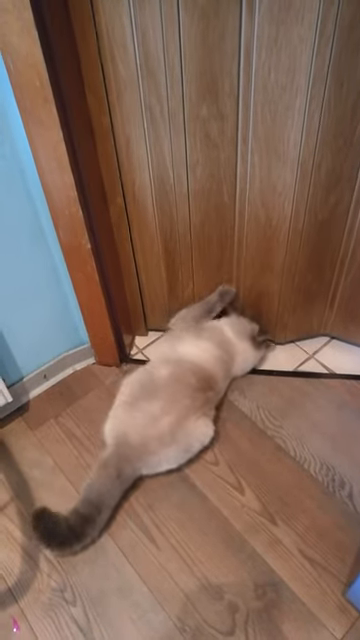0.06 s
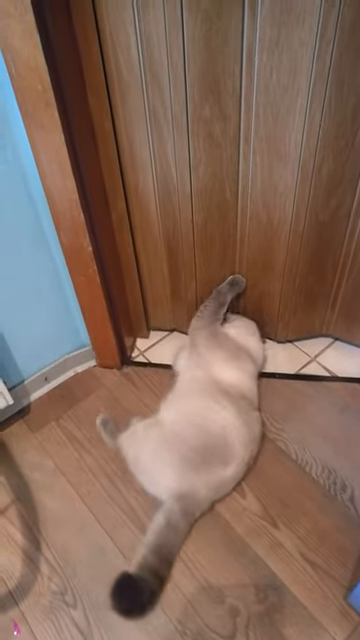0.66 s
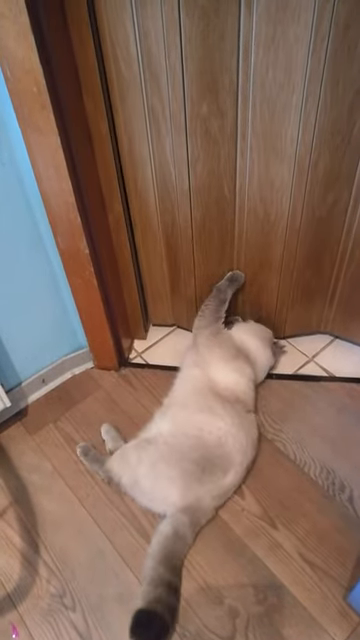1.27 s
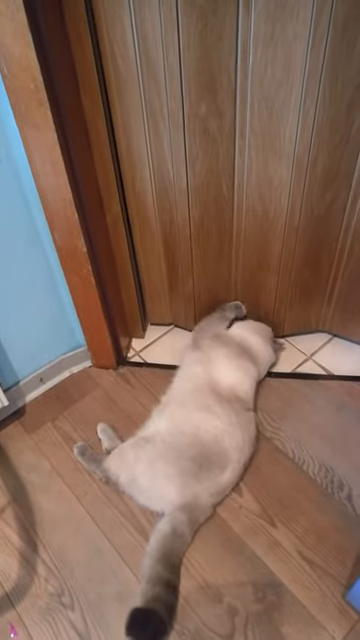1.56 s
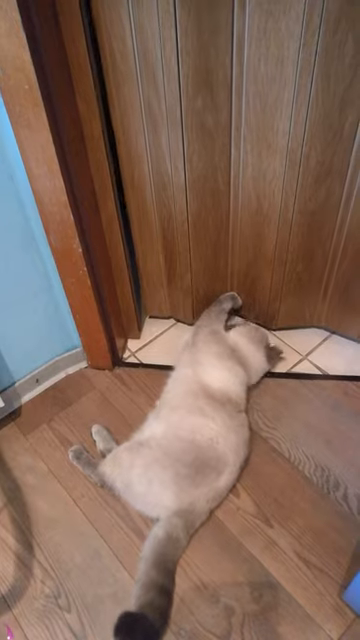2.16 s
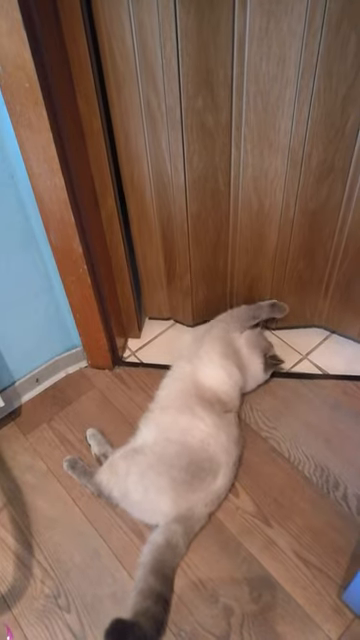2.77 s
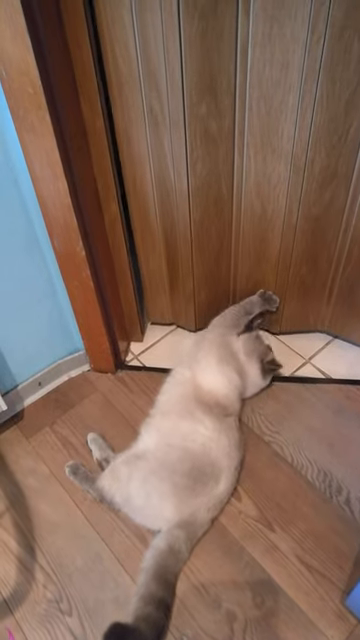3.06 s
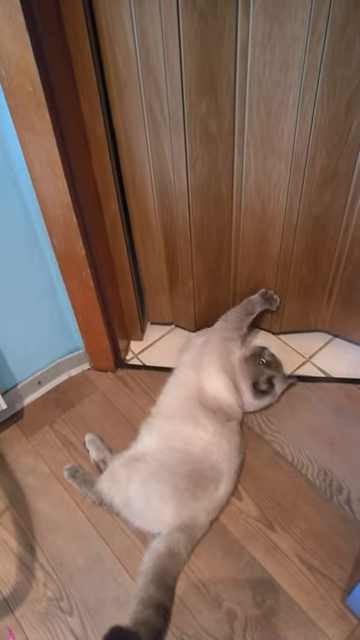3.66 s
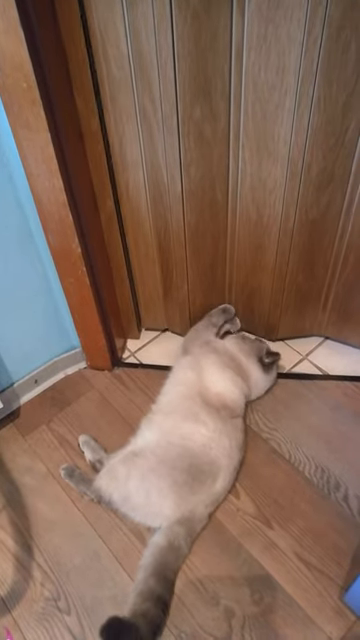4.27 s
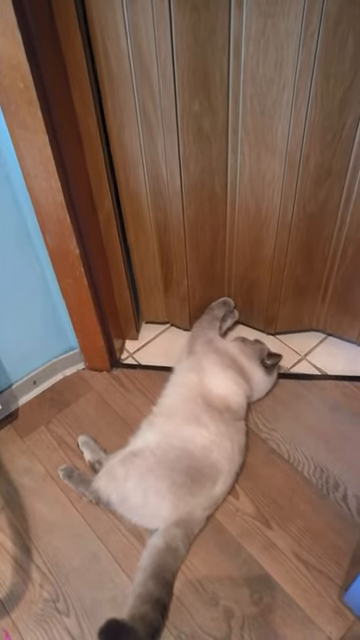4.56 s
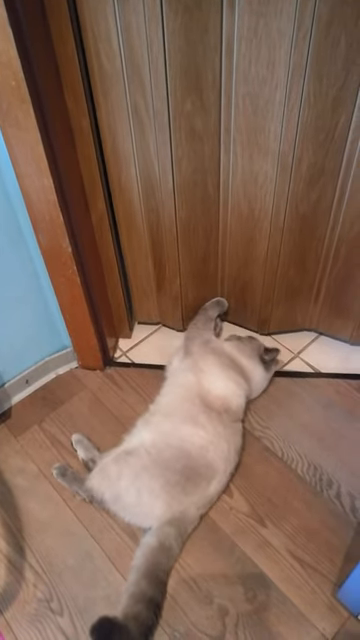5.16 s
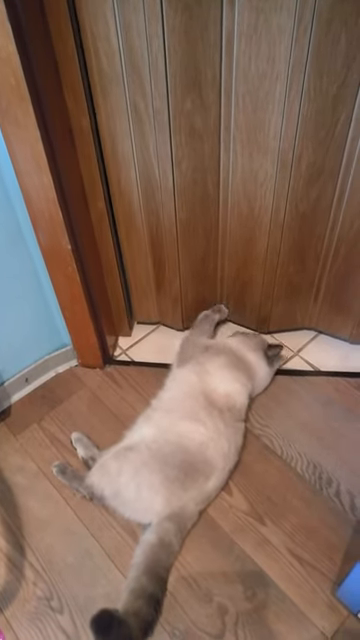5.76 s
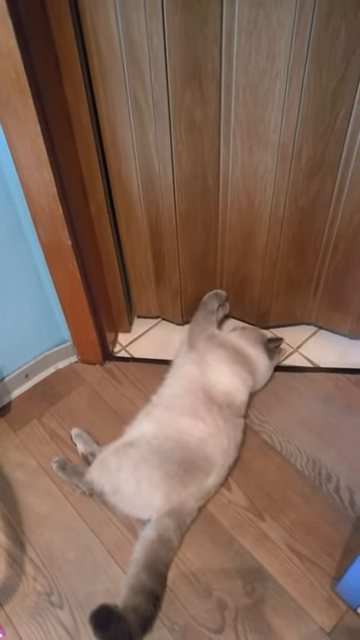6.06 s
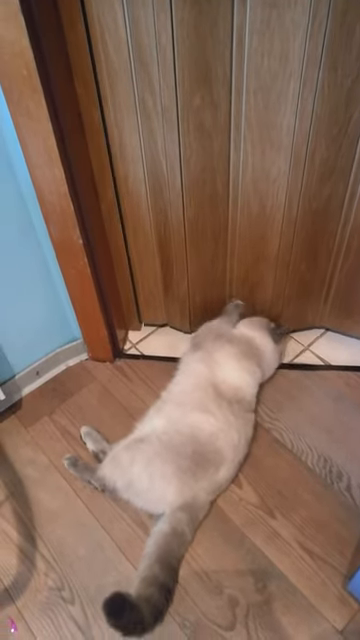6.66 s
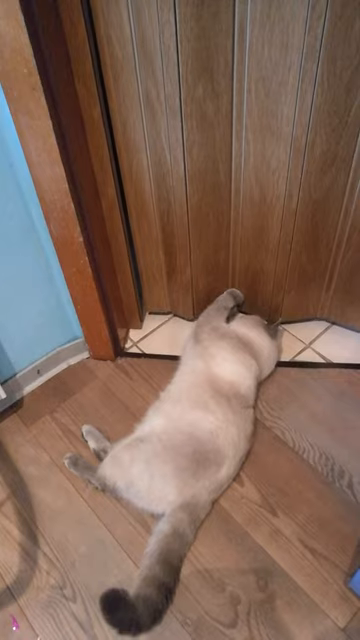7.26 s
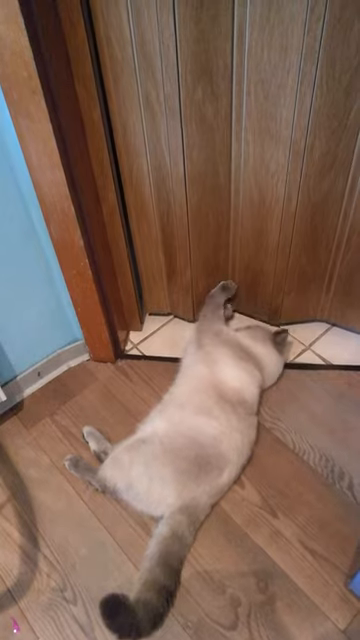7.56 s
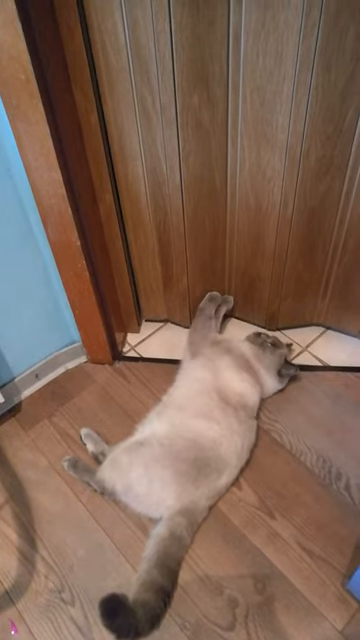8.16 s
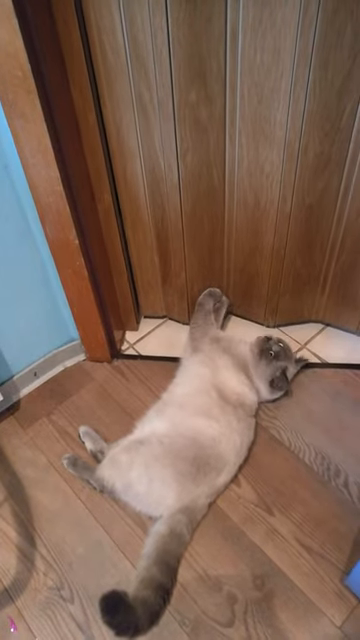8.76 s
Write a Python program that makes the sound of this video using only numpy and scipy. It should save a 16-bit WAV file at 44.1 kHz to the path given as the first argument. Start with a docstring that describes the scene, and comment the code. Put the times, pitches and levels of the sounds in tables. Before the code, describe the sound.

A cat scratches at a folding door, heard from nearby in a small room with a short, bright echo and a very quiet hush. From about 0.4 to 1.3 seconds, claws click rapidly and scrape over thin hollow slats while the door rumbles softly in its track. A second flurry from 1.6 seconds peaks in clattering knocks near 2 seconds, followed by a tiny paw squeak and more scratches around 2.5. From 3 to 4.7 seconds there are only light ticks, weak scrapes and faint swishes like cat sniffs or fur rubs. A hollow thump lands at 5 seconds, with smaller bumps after it. Quick claw ticks and gritty strokes return from 6 seconds, with a low bump at 6.6 and a sharp click and knock at 7.6. Another small squeak and soft swishes follow from 8 seconds, over a barely audible high whine.

```python
"""A cat paws at a folding door in a small hard room, heard from a phone held above.
Claws flick the thin hollow slats and drag over them in gritty stick-slip strokes; pads squeak.
Soft swishes come between: faint breaths or sniffs, among pad and fur rubs.
The shoved door knocks, rings hollow and rumbles in its track. The room adds a short
bright ring over a very quiet hush; a faint thin whine joins near the end."""
import sys
import numpy as np
from scipy import signal
from scipy.fft import rfft, irfft
from scipy.io import wavfile
from scipy.ndimage import uniform_filter1d

SR = 44100
rng = np.random.default_rng(int(sys.argv[2]) if len(sys.argv) > 2 else 0)


def dump_mix(stems):
    """Bounce the given channels to the path in sys.argv[1] as a 16-bit WAV at rate SR."""
    frames = np.atleast_2d(stems).T  # one column per channel
    limited = np.clip(frames, -1, 1)  # hard clip at full scale
    pcm = np.round(limited * 32767).astype(np.int16)
    wavfile.write(sys.argv[1], SR, pcm)


N = 393372
TIME_S = np.arange(N) / SR

# room hush spectrum: (frequency [Hz], gain [dB])
HUSH_EQ = [(25, -16), (70, -9), (110, -10.5), (220, -8), (500, -20.5), (1000, -19.5), (2500, -20.5),
           (6000, -29.5), (16000, -37)]
# paw strokes: (time [s], length [s], relative scrape level [dB], tilt [dB/octave], push level [dB])
PAW_STROKES = [(.01, 0.1, -64.5, 2.5, -57.5), (0.227, 0.2, -55.5, 0, -54), (0.427, 0.15, -45, 0.5, -50),
               (0.633, 0.18, -59, -3.5, -58), (0.801, 0.055, -49, 0, -45.5), (0.94, 0.08, -40, 2.5, -49.5),
               (1.055, 0.16, -52, -1, -53.5), (1.192, 0.11, -52, 0, -54), (1.582, 0.078, -49, -4.5, -49),
               (1.68, 0.16, -58, 0, -52), (1.824, 0.086, -43, 0, -47.5), (1.919, 0.07, -49, -1, -50),
               (2.25, 0.078, -51, 2, -67.5), (2.542, 0.06, -38.5, 2.5, -54), (2.72, 0.039, -60, 8, -66),
               (2.859, 0.048, -51.5, 1, -58), (3.1, 0.089, -59, 3.5, -75), (3.668, 0.28, -65, 5.5, -84),
               (3.874, 0.075, -56.5, -1, -55), (4.038, 0.093, -50.5, 2.5, -52.5),
               (4.181, 0.067, -64, -6, -63), (4.262, 0.24, -66.5, 2.5, -81), (4.952, 0.043, -43, -1, -44),
               (5.028, 0.092, -56, -5, -50), (5.204, 0.11, -64.5, -4.5, -57),
               (5.389, 0.093, -59.5, -0.5, -59), (5.555, 0.061, -57.5, -2, -49),
               (5.648, 0.11, -65, -3, -61), (5.904, 0.032, -68.5, 5, -62.5),
               (6.017, 0.13, -57.5, -1.5, -67.5), (6.204, 0.1, -46, 0.5, -69), (6.391, 0.1, -51, 0, -61.5),
               (6.59, 0.14, -45, 0, -47.5), (6.812, 0.17, -58, 1, -66.5), (6.984, 0.098, -48, 0.5, -55.5),
               (7.155, 0.082, -60, 4.5, -55), (7.298, 0.065, -56, 1, -54), (7.367, 0.12, -47, -2, -49),
               (7.563, 0.034, -45, -4, -47), (7.599, 0.03, -40.5, -2.5, -40.5),
               (7.681, 0.07, -47, -3.5, -48.5), (7.949, 0.064, -56.5, 0, -57),
               (8.067, 0.032, -55, -1, -55.5), (8.198, 0.57, -67, -1.5, -67.5)]
# scrape spectrum: (frequency [Hz], gain [dB])
SCRAPE_EQ = [(40, -15.5), (200, -13.5), (400, -2.5), (620, -1), (1050, 1.5), (1600, 3), (3200, 2),
             (6000, -0.5), (9000, -4), (13000, -6), (16000, -19)]
# slat resonances: (frequency [Hz], width [Hz], gain [dB])
SLAT_RESONANCES = [(69.7, 11, 11), (122, 24, 5.5), (167, 20, 4.5), (195, 13, 9.5), (265, 24, 3.5),
                   (326, 42, 4.5), (404, 23, 8.5), (619, 14, -1.5), (991, 20, 2), (1119, 72, 5),
                   (1533, 190, 3.5), (2600, 28, -2.5)]
# door shudder spectrum: (frequency [Hz], gain [dB])
RUMBLE_EQ = [(25, -30), (45, -10.5), (70, -3.5), (150, -4.5), (250, -6.5), (420, -14), (600, -17.5),
             (1200, -14.5), (3000, -46)]
# room decay: (frequency [Hz], T60 [s])
ROOM_DECAY = [(100, 0.17), (300, 0.35), (800, 0.42), (2000, 0.31), (5000, 0.3), (13000, 0.22)]
# claw flicks: (time [s], relative level [dB], spot)
FLICKS = [(0.105, -60, "tip"), (0.125, -48, "tip"), (0.269, -59, "glance"), (0.2907, -51, "tip"),
          (0.3893, -33.5, "slat"), (0.3978, -40, "edge"), (0.4121, -42, "edge"), (0.427, -33.5, "slat"),
          (0.443, -34, "slat"), (0.461, -34.5, "slat"), (0.4783, -33, "slat"), (0.495, -45, "slat"),
          (0.5213, -32, "slat"), (0.5503, -33.5, "slat"), (0.752, -43.5, "edge"), (0.7974, -31.5, "slat"),
          (0.829, -38.5, "edge"), (0.9388, -35, "slat"), (0.961, -37.5, "edge"), (0.9752, -35.5, "slat"),
          (0.9973, -36.5, "slat"), (1.009, -38, "slat"), (1.1469, -40.5, "edge"), (1.186, -34, "slat"),
          (1.578, -40.5, "tip"), (1.586, -42, "corner"), (1.5935, -38, "edge"), (1.605, -44, "edge"),
          (1.618, -41, "slat"), (1.629, -41.5, "slat"), (1.642, -37.5, "edge"), (1.741, -54, "tip"),
          (1.8225, -39, "edge"), (1.828, -41.5, "tip"), (1.848, -39, "corner"), (1.863, -45, "edge"),
          (1.88, -38, "slat"), (1.901, -38.5, "slat"), (1.922, -26.5, "corner"), (1.9336, -32, "edge"),
          (1.9648, -30, "corner"), (1.9932, -35.5, "edge"), (2.0268, -34, "corner"), (2.206, -50.5, "rib"),
          (2.245, -40.5, "corner"), (2.4106, -41.5, "glance"), (2.52, -49, "corner"), (2.5276, -44, "tip"),
          (2.5429, -39.5, "corner"), (2.563, -36.5, "tip"), (2.574, -38, "tip"), (2.608, -43, "tip"),
          (2.7272, -50.5, "seam"), (2.7667, -61, "tip"), (2.8971, -54.5, "corner"), (2.912, -50.5, "edge"),
          (3.0385, -62.5, "tip"), (3.1012, -50.5, "corner"), (3.223, -47.5, "corner"),
          (3.2422, -40.5, "corner"), (3.5071, -49, "edge"), (3.664, -54, "tip"), (3.683, -56.5, "hollow"),
          (3.7528, -61, "glance"), (3.868, -61, "tip"), (3.911, -60, "tip"), (3.9575, -57.5, "tip"),
          (4.055, -59, "tip"), (4.0765, -50, "corner"), (4.298, -49, "seam"), (4.709, -46.5, "rib"),
          (4.729, -44, "rib"), (4.8787, -43, "rib"), (4.9402, -42, "rib"), (4.9591, -41.5, "slat"),
          (5.039, -56, "corner"), (5.123, -54.5, "hollow"), (5.221, -56, "hollow"), (5.253, -60, "hollow"),
          (5.558, -55.5, "edge"), (5.676, -56.5, "hollow"), (5.698, -63, "rib"), (5.9169, -59.5, "tip"),
          (6.029, -61, "rib"), (6.086, -45, "rib"), (6.1258, -44.5, "rib"), (6.192, -43, "rib"),
          (6.2028, -48, "rib"), (6.2177, -41, "rib"), (6.232, -44, "rib"), (6.2595, -42.5, "rib"),
          (6.269, -48, "rib"), (6.279, -42.5, "rib"), (6.289, -43, "rib"), (6.379, -39, "rib"),
          (6.4827, -53, "edge"), (6.5772, -46, "edge"), (6.657, -48.5, "corner"), (6.68, -50, "tip"),
          (6.826, -58, "rib"), (6.864, -50, "seam"), (6.9552, -46, "hollow"), (7.096, -50, "hollow"),
          (7.239, -53.5, "slat"), (7.282, -49.5, "hollow"), (7.2977, -49.5, "corner"), (7.3348, -53, "tip"),
          (7.353, -47.5, "rib"), (7.365, -37, "edge"), (7.546, -49.5, "edge"), (7.572, -39.5, "hollow"),
          (7.5957, -26, "seam"), (7.6042, -39.5, "seam"), (7.698, -54, "rib")]
# where a claw catches: spot -> (woody body [dB], sharp edge [dB], ring [Hz], left minus right [dB])
CATCH_SPOTS = {"slat": (4.5, -7, 2688, 0.5), "rib": (-2.5, -7, 3596, -1), "hollow": (5.5, -19, 1941.5, 0),
               "tip": (-9.5, -1.5, 10497.5, 2), "edge": (1.5, -5.5, 4396.5, 0.5),
               "corner": (-1.5, -3.5, 6900, 0.5), "glance": (-29, -0.5, 7294.5, 1.5),
               "seam": (-6.5, -14.5, 5000, -1.5)}
# door on frame: (time [s], relative clatter level [dB], ring level [dB], ring centre [Hz], rise [s])
DOOR_KNOCKS = [(0.24, -67, -43.5, 168, .008), (1.264, -55, -43.5, 100, .004),
               (1.796, -46.5, -43, 229, .004), (1.924, -37.5, -42, 393, .001),
               (1.999, -41, -44, 400, 0.0011), (2.56, -44, -53, 393, 0.0035),
               (2.884, -65, -48, 149, 0.0048), (3.892, -44.5, -50, 400, 0.01),
               (4.969, -35.5, -32, 136, 0.0043), (5.12, -44.5, -43.5, 228, 0.0027),
               (5.574, -49.5, -39, 99, 0.0056), (6.63, -41.5, -39, 72.6, 0.0072),
               (7.584, -54, -38, 80, 0.0051), (7.597, -37.5, -43, 565, 0.00073),
               (8.085, -54.5, -52, 190, 0.0044)]
# clatter spectrum: (frequency [Hz], gain [dB])
CLATTER_EQ = [(30, -15.5), (70, -7), (200, -5), (400, -3), (700, -4.5), (1200, -7.5), (2500, -13.5),
              (6000, -34)]
# soft swishes: faint breaths or sniffs, among pad and fur rubs
# (time [s], length [s], relative level [dB], centre [Hz], width [octaves])
SOFT_SWISHES = [(1.428, 0.14, -57, 2070, 0.82), (3.048, 0.36, -61.5, 1220, 0.9),
                (3.064, 0.34, -65.5, 414, 0.38), (3.401, 0.12, -59.5, 1950, 0.73),
                (3.484, 0.03, -52, 1830, 0.77), (3.742, 0.12, -59, 6760, 0.17),
                (4.003, 0.042, -54.5, 1800, 0.4), (4.244, 0.047, -60.5, 2370, 0.78),
                (4.404, 0.082, -59, 2150, 0.76), (5.402, 0.085, -57.5, 2030, 0.8),
                (7.983, 0.057, -49.5, 3470, 0.65), (8.071, 0.054, -56, 1440, 1.3),
                (8.19, 0.03, -63.5, 1120, 0.98), (8.397, 0.089, -56, 2080, 0.77),
                (8.607, 0.081, -62, 1780, 1.3)]
# pad squeaks: (time [s], length [s], relative level [dB], start pitch [Hz], end pitch [Hz])
PAD_SQUEAKS = [(2.206, 0.049, -52, 1766, 1453), (7.989, 0.063, -54.5, 2430, 1990)]


def undb(db):
    """Decibels to gain."""
    return 10 ** (np.asarray(db) / 20)


def unit(x):
    """Scale to rms 1."""
    return x / np.sqrt(np.mean(x ** 2))


def bins_hz(size):
    """FFT bin frequencies, floored at 1 Hz."""
    return np.maximum(np.arange(size // 2 + 1) * SR / size, 1)


def curve(points, hz):
    """Interpolate (Hz, value) points over log frequency."""
    points_hz, values = np.transpose(points)
    return np.interp(np.log(hz), np.log(points_hz), values)


def shape(x, gain):
    """Filter by a gain per bin."""
    return irfft(rfft(x) * gain, x.shape[-1])


def add(out, start_s, x):
    """Mix x in at start_s."""
    i = max(int(start_s * SR), 0)
    out[..., i:i + x.shape[-1]] += x[..., :max(N - i, 0)]


def min_phase(db):
    """Minimum-phase spectrum with this magnitude."""
    cepstrum = irfft(db * np.log(10) / 20)
    half = len(cepstrum) // 2
    cepstrum[1:half] *= 2
    cepstrum[half + 1:] = 0
    return np.exp(rfft(cepstrum))


def convolve(x, response):
    """Convolve per channel, at most N samples."""
    return signal.fftconvolve(np.atleast_2d(x), np.atleast_2d(response), axes=1)[:, :N]


def noise(size):
    """Uncorrelated stereo white noise."""
    return rng.standard_normal((2, size))


def coloured_noise(size, eq):
    """Stereo noise through an EQ table."""
    return shape(noise(size), undb(curve(eq, bins_hz(size))))


def even_spectrum(x, width_hz=350):
    """Spectrum of a burst, chance peaks and dips levelled so it has no pitch."""
    spectrum = rfft(x)
    width_bins = width_hz * x.shape[1] / SR
    power = uniform_filter1d(np.abs(spectrum) ** 2, max(int(width_bins), 1)) + 1e-12
    broad = uniform_filter1d(power, max(int(8 * width_bins), 1))
    return spectrum * np.array([min_phase(db) for db in 10 * np.log10(np.abs(broad / power))])


def mic_pair(hz, lag_s, pan_db=0):
    """Time and level offset of the direct sound at two microphones."""
    delay_s = .001 + np.array([[-lag_s], [lag_s]]) / 2
    return np.exp(-2j * np.pi * hz * delay_s) * undb([[pan_db / 2], [-pan_db / 2]])


def hush(level_db=-69):
    """Steady room noise."""
    return unit(coloured_noise(N, HUSH_EQ)) * undb(level_db)


def slips(size, rate_hz=130, slowing=.8, jitter=.25, scatter_db=5.5):
    """Claw stick-slip pulses, slowing as the stroke runs out."""
    gap_draw, level_draw = rng.standard_normal((80, 2)).T
    gaps_s = np.exp(jitter * gap_draw) / rate_hz
    progress = np.minimum(np.cumsum(gaps_s) * SR / size, 1)
    at = (np.cumsum(gaps_s * (1 + slowing * progress)) * SR).astype(int)
    train = np.zeros(size)
    train[at[at < size]] = undb(scatter_db * level_draw[at < size])
    return unit(train + 1e-9)


def grit(size, rate_hz, spread_db):
    """Random tiny impulses, mostly weak, a few strong."""
    hit = rng.random(size) < rate_hz / SR
    hit[0] = True
    sign = rng.choice([-1, 1], size)
    return unit(hit * sign * undb(spread_db * np.minimum(rng.exponential(size=size), 4)))


def bending(size, delay_1khz_s):
    """Complex phase of a bending wave across a slat: treble arrives first."""
    delay_s = delay_1khz_s * np.sqrt(1000 / np.maximum(bins_hz(size), 300))
    return -2j * np.pi * np.cumsum(delay_s - delay_s[-1]) * SR / size


def scrapes(gain_db=-4, patchy_db=3.5, rise_s=.006, fall_s=.0091, bite_db=-49, burst_db=-2):
    """Light strokes slide on grit; hard ones bite and stick-slip. Each pulse is a snap and a burst."""
    out, size, grain_s = np.zeros((2, N)), 1024, .0004
    hz = bins_hz(size)
    grain = np.exp(-2 * TIME_S[:size] / grain_s)
    for start_s, length_s, db, tilt_db_oct, _ in PAW_STROKES:
        n = int(length_s * SR)
        t = TIME_S[:n]
        pressure = undb(patchy_db * np.interp(t, np.arange(40) / 100, rng.standard_normal(40)))
        pressure *= np.minimum(1, np.minimum(t / rise_s, (length_s - t) / fall_s))
        bite = 1 / (1.5 + np.exp((bite_db - db) / 4))
        force = unit((bite * slips(n) + .42 * grit(n, rate_hz=2000, spread_db=4.5)) * pressure)
        snaps = convolve(force, irfft(np.exp(bending(size, .0012)) * mic_pair(hz, lag_s=.00032)))
        bursts = noise(snaps.shape[1]) * np.sqrt(np.abs(convolve(force ** 2, grain / grain.sum())))
        tilt_db = tilt_db_oct * np.log2(np.maximum(hz, 500) / 3000)
        wood = irfft(min_phase(curve(SCRAPE_EQ, hz) + tilt_db))
        wood /= np.sqrt(np.sum(wood ** 2) * (1 + undb(burst_db) ** 2))
        add(out, start_s, convolve(snaps + undb(burst_db) * bursts, wood) * undb(db + gain_db))
    return out


def slats(x):
    """Slat resonances colour whatever drives them."""
    hz = bins_hz(16384)
    peaks_db = sum(db / (1 + (2 * (hz - mode_hz) / width_hz) ** 2)
                   for mode_hz, width_hz, db in SLAT_RESONANCES)
    return convolve(x, irfft(min_phase(peaks_db)))


def rumble(rise_s=.0028, decay_s=.05):
    """The door shudders in its track while pushed, then rings out."""
    shudder = unit(slats(coloured_noise(N, RUMBLE_EQ)))
    shudder /= np.sqrt(uniform_filter1d(np.mean(shudder ** 2, axis=0), 2600))  # push alone sets level
    power, t = np.zeros(N), TIME_S[:SR]
    for start_s, length_s, _, _, push_db in PAW_STROKES:
        envelope = np.minimum(t / rise_s, 1) * np.exp(-np.maximum(t - length_s, 0) / decay_s)
        add(power, start_s, (undb(push_db) * envelope) ** 2)
    return shudder * np.sqrt(power)


def room(x, wet_db=1.88, bass_db=-7, build_s=.00063, sparse_s=.0065, scatter_db=3):
    """Echoes thicken into a tail, longest in the mids; the pattern changes as the paw moves."""
    out, size, block = x.copy(), 20000, 33000
    t, hz = TIME_S[:size], bins_hz(size)
    centres_hz, t60s_s = np.transpose(ROOM_DECAY)
    bands = [curve(list(zip(centres_hz, share)), hz) for share in np.eye(len(centres_hz))]
    bass_cut = min_phase(curve([(150, bass_db), (900, 0)], hz))
    early_db = scatter_db * np.exp(-t / sparse_s)
    for i in range(0, N, block):
        echoes = noise(size) * undb(early_db * np.repeat(rng.standard_normal(size // 20), 20))
        tail = sum(shape(echoes, band) * undb(-60 * t / t60_s) for band, t60_s in zip(bands, t60s_s))
        tail = irfft(even_spectrum(tail * (1 - np.exp(-t / build_s))))
        tail = shape(tail / np.sqrt(np.sum(tail ** 2, axis=1, keepdims=True)), bass_cut)
        add(out, i / SR, undb(wet_db) * convolve(x[:, i:i + block], tail))
    return out


def spot_colour_db(hz, body_db, edge_db, ring_hz, ring_db=3.5, ring_oct=.42, ripple_oct=.2):
    """Colour of one claw catch: body, edge, a randomly detuned ring and random ripple."""
    ring_hz = ring_hz * np.exp(.044 * rng.standard_normal())
    base_db = curve([(30, -23), (100, body_db - 10.5), (380, body_db - 10), (600, body_db - 10),
                     (1050, body_db), (1600, body_db * .42), (2800, body_db * .17), (4800, 0),
                     (6600, edge_db * .24 + 1.5), (8800, edge_db + 5), (15000, edge_db - .5)], hz)
    peak_db = ring_db * np.exp(-(np.log2(hz / ring_hz) / ring_oct) ** 2)
    ripple_db = np.interp(np.log2(hz) / ripple_oct, np.arange(160), rng.standard_normal(160))
    return base_db + peak_db + ripple_db


def claw_flicks(gain_db=28.5, bend_s=.0034, chatter_s=.0027, wood_cutoff_hz=6000, lag_s=.0003005):
    """A snap, dispersed by bending waves in the slat, plus brief duller chatter."""
    out, size = np.zeros((2, N)), 2048
    t, hz = TIME_S[:size], bins_hz(size)
    phase = bending(size, bend_s)
    near = np.exp(phase / 5)
    wood = 1 / np.sqrt(1 + (hz / wood_cutoff_hz) ** 2)
    for start_s, db, spot in FLICKS:
        body_db, edge_db, ring_hz, pan_db = CATCH_SPOTS[spot]
        colour = min_phase(spot_colour_db(hz, body_db, edge_db, ring_hz))
        chatter = even_spectrum(noise(size) * np.exp(-t / chatter_s)) * np.sqrt(2 / (chatter_s * SR))
        far = np.exp(phase * (1 + rng.uniform(-.3, .3)))  # path to the slat's edge varies
        snap = (1 - wood / 2) * near + wood * (.85 * far + .55 * chatter)
        mics = mic_pair(hz, lag_s * (1 + .3 * rng.standard_normal()), pan_db)
        add(out, start_s - .001, irfft(colour * snap * mics) * undb(db + gain_db))
    return out


def knocks(gain_db=-3, decay_s=.013):
    """The lower edge bumps the frame and loose hinges clatter; soft bumps swell more slowly."""
    out, t = np.zeros((2, N)), TIME_S[:6000]
    for start_s, db, _, _, rise_s in DOOR_KNOCKS:
        clatter = unit(coloured_noise(len(t), CLATTER_EQ))
        envelope = np.minimum(t / rise_s, 1) * np.exp(-np.maximum(t - rise_s, 0) / decay_s)
        add(out, start_s, clatter * envelope * undb(db + gain_db))
    return out


def hollow_ring(damping=.88, width_oct=.48, detune=.008, phase_spread_rad=.46):
    """A knock rings the slat modes, the narrowest longest; where it lands decides which speak."""
    out, t = np.zeros((2, N)), TIME_S[:SR // 2]
    modes_hz, widths_hz, _ = np.transpose(SLAT_RESONANCES)
    decays = np.exp(-np.pi * damping * np.outer(widths_hz, t))
    for start_s, _, db, centre_hz, rise_s in DOOR_KNOCKS:
        pitch_draw, phase_draw = rng.standard_normal((2, len(modes_hz)))
        weight = np.exp(-(np.log2(modes_hz / centre_hz) / width_oct) ** 2)
        weight /= np.sqrt(np.sum(weight ** 2) / 2)
        phase = 2 * np.pi * np.outer(modes_hz * (1 + detune * pitch_draw), t)
        offset_rad = phase_spread_rad * phase_draw[:, None]
        ring = np.array([weight @ (decays * np.sin(phase + side * offset_rad)) for side in (1, -1)])
        add(out, start_s, ring * (1 - np.exp(-t / rise_s)) * undb(db))
    return out


def swishes(gain_db=-3, hiss_db=-20):
    """Faint breaths or sniffs, and rubs: a noise band swells under faint hiss; the highest crackle."""
    out = np.zeros((2, N))
    for start_s, length_s, db, centre_hz, width_oct in SOFT_SWISHES:
        n = int(length_s * SR)
        hz = bins_hz(n)
        away_oct = np.log2(hz / centre_hz)
        colour = np.exp(-(away_oct / width_oct) ** 2) + undb(hiss_db) / (1 + ((away_oct - 1) / 2) ** 4)
        grains = grit(n, rate_hz=5000 * (2000 / centre_hz) ** 3, spread_db=3.5)
        swell = np.sin(np.pi * np.arange(n) / n)
        swish = unit(shape(grains * swell, colour * mic_pair(hz, lag_s=.00018)))
        add(out, start_s, swish * undb(db + gain_db))
    return out


def squeaks(gain_db=-3, rise_s=.0017, fall_s=.0097, waver=.064, waver_s=.00083):
    """A pad sticks on the smooth slat; the rough pitch falls as the paw slows."""
    out = np.zeros((2, N))
    for start_s, length_s, db, from_hz, to_hz in PAD_SQUEAKS:
        t = TIME_S[:int(length_s * SR)]
        wobble = unit(uniform_filter1d(rng.standard_normal(len(t)), int(waver_s * SR)))
        hz = (from_hz + (to_hz - from_hz) * t / length_s) * (1 + waver * wobble)
        tone = np.sin(2 * np.pi * np.cumsum(hz) / SR)
        envelope = np.minimum(1, np.minimum(t / rise_s, (length_s - t) / fall_s))
        add(out, start_s, unit(tone * envelope) * undb(db + gain_db))
    return out


def whine(pitch_hz=7130, level_db=-85, start_s=7.5, rise_s=.4):
    """A faint thin tone fades in and holds."""
    fade = np.clip((TIME_S - start_s) / rise_s, 0, 1)
    return unit(np.sin(2 * np.pi * pitch_hz * TIME_S)) * fade * undb(level_db)


def suppress(x, threshold_db=-68, depth_db=-8, from_hz=1200):
    """The phone's noise suppressor turns quiet treble further down."""
    treble = shape(x, 1 / (1 + (from_hz / bins_hz(N)) ** 4))
    power = uniform_filter1d(np.mean(treble ** 2, axis=0), 900)
    quiet = 1 / (1 + np.abs(power) / undb(threshold_db) ** 2)
    return x + treble * (undb(depth_db * quiet) - 1)


def scene():
    """Cat and door in the room, plus the door's ring and rumble over the background."""
    direct = slats(claw_flicks() + scrapes() + knocks()) + swishes() + squeaks()
    return room(direct) + hollow_ring() + rumble() + hush() + whine()


def record(dry):
    """The phone's two close microphones share the bass; pauses are hushed, the top is cut."""
    mono_below_hz, top_hz = 255, 16000
    mid, side = (dry[0] + dry[1]) / 2, (dry[0] - dry[1]) / 2
    side = shape(side, undb(.7) / np.sqrt(1 + (mono_below_hz / bins_hz(N)) ** 12))
    lowpass = signal.ellip(8, .2, 70, top_hz, fs=SR, output="sos")
    return signal.sosfilt(lowpass, suppress(np.array([mid + side, mid - side])))


dry = scene()
out = record(dry)
dump_mix(out)
```